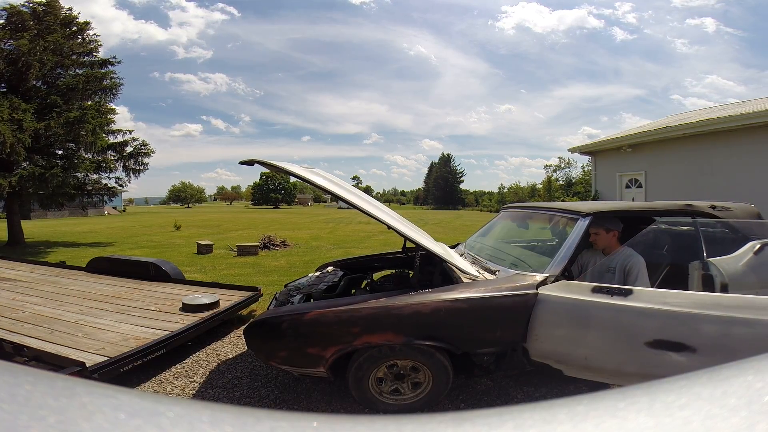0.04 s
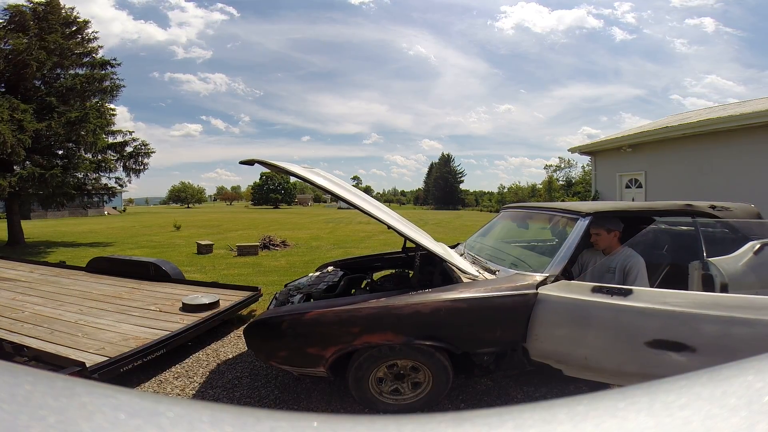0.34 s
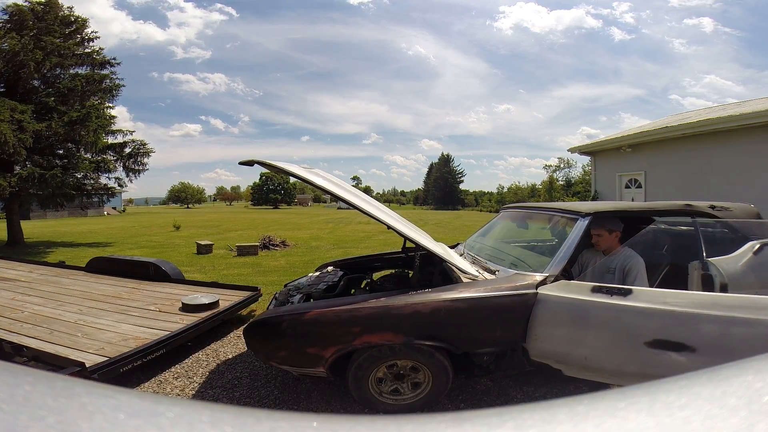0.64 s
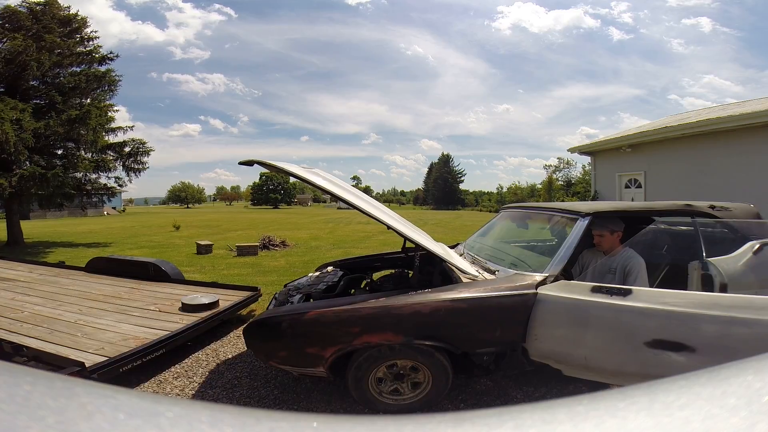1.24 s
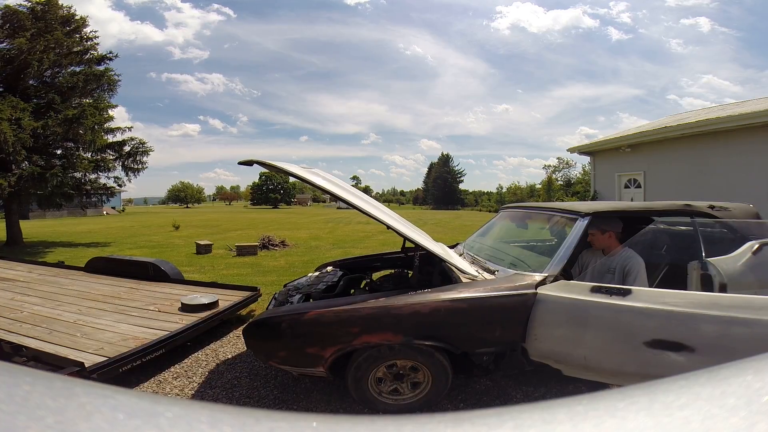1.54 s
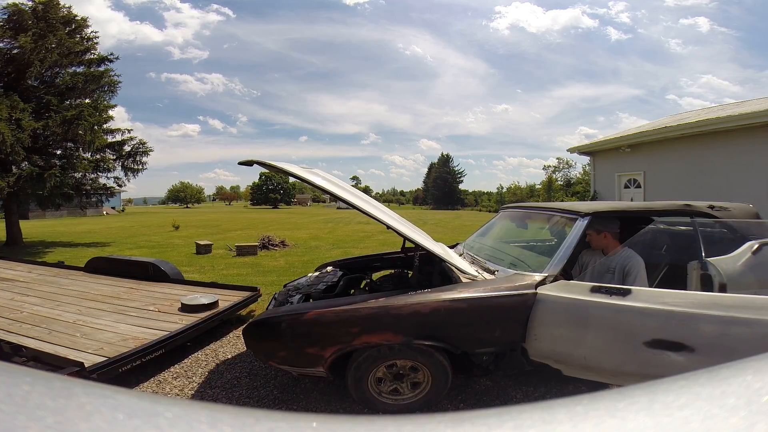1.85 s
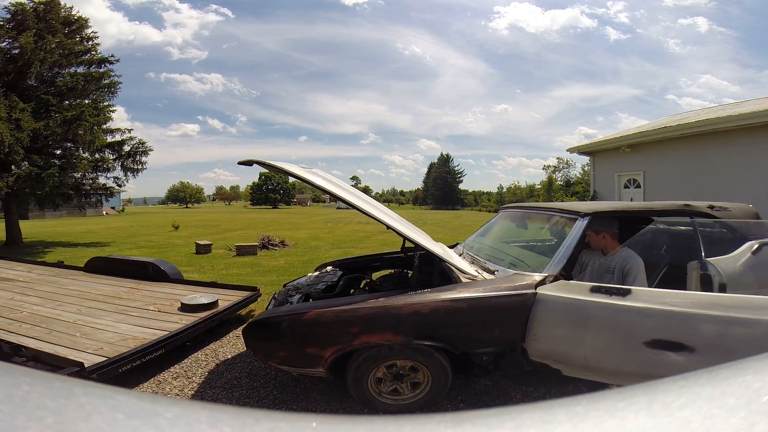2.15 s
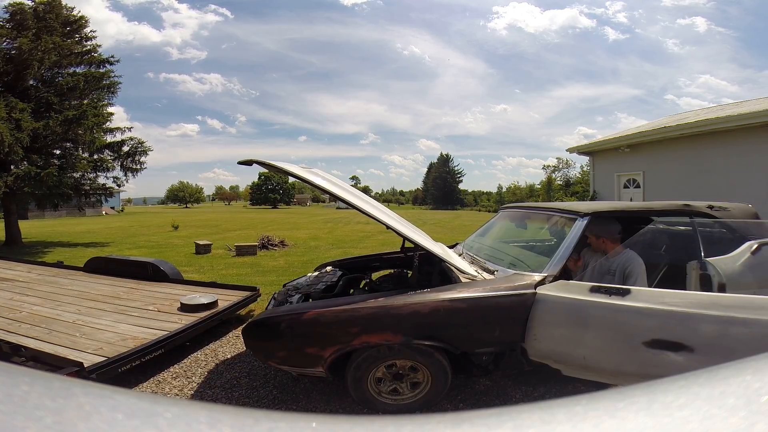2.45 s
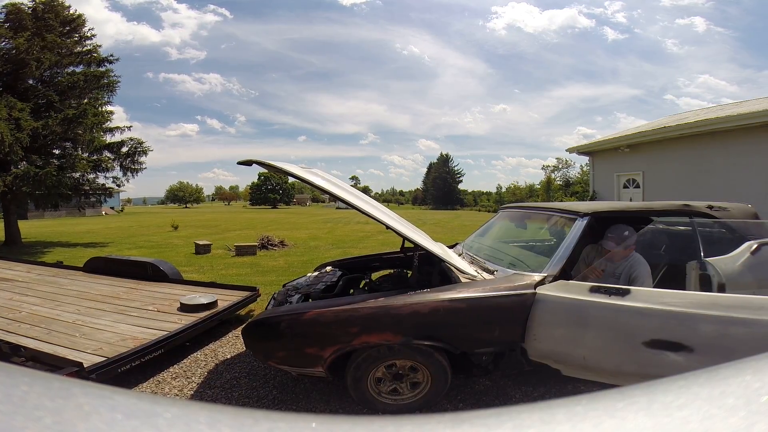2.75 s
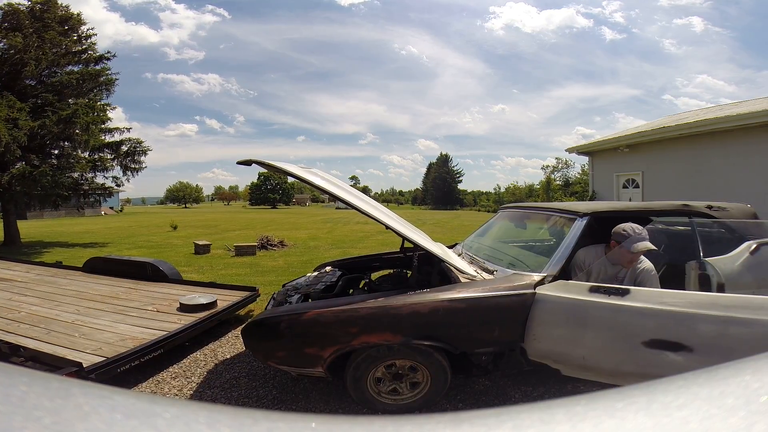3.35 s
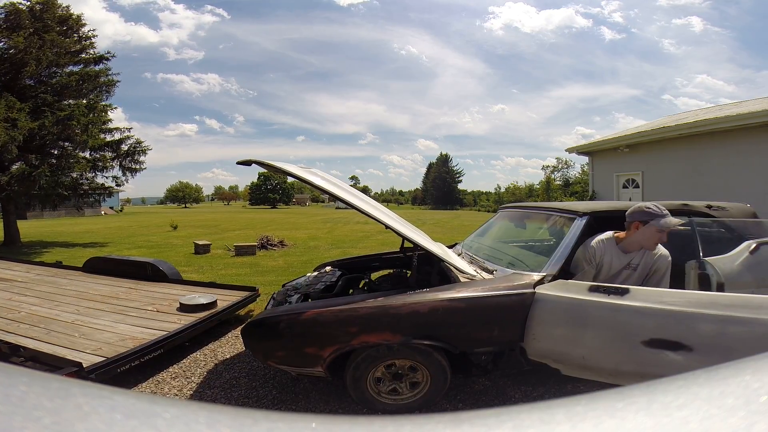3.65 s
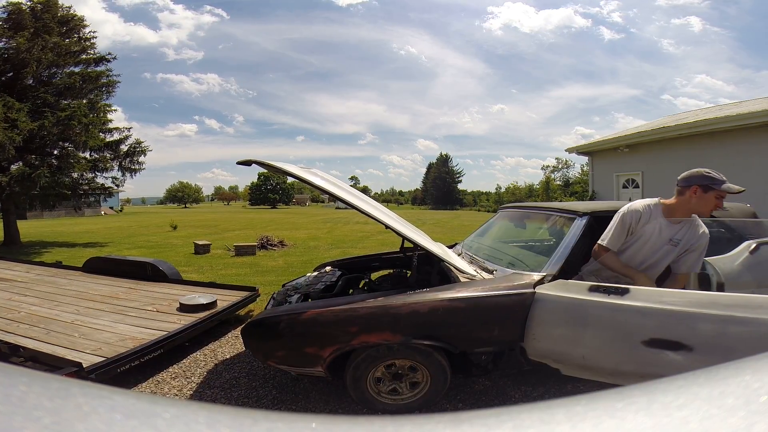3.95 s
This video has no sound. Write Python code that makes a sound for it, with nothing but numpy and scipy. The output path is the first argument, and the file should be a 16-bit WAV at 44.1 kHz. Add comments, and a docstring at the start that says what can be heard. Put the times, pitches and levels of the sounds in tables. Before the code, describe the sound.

A big car engine idles close by outdoors, hood open, with a deep, loping rumble. The exhaust burbles and pops, stumbles twice with a low cough, then slowly picks up, under pulsing hiss and bursts of clatter.

```python
"""A deep, loping exhaust boom: a big eight-cylinder engine idles on a gravel drive by a shed, hood open.
Uneven firings ring the pipe and burble and pop in the muffler; the engine nearly stumbles twice,
coughing low, and slowly picks up. On top, gas hisses in time with the cylinders and spits against
ringing sheet metal, and bursts of clatter come and go. Behind it all lies the soft rush of the fan."""
import sys
import numpy as np
from scipy import signal
from scipy.io import wavfile
from scipy.ndimage import uniform_filter1d

SR = 44100
rng = np.random.default_rng(int(sys.argv[2]) if len(sys.argv) > 2 else 0)


def materialize(psi):
    """Save the field psi as 16-bit PCM at rate SR to the path in sys.argv[1].

    A 1-D psi becomes a single channel; in a 2-D psi each row is a channel.
    """
    bounded = np.clip(np.atleast_2d(psi).T, -1, 1)
    quanta = np.round(bounded * 32767).astype(np.int16)
    wavfile.write(sys.argv[1], SR, quanta)


N = 176400
T = np.arange(N) / SR


def amp(db):
    """Decibels to gain."""
    return 10 ** (np.asarray(db) / 20)


def unit_rms(x):
    """Scales to rms 1."""
    return x / np.sqrt(np.mean(x ** 2) + 1e-20)


def curve(table):
    """Straight ramps between breakpoints in time."""
    return np.interp(T, *np.transpose(table))


def colour(x, spectrum, size=8192):
    """Minimum-phase EQ of unit energy: its peaks ring after each hit."""
    hz, db = np.transpose(spectrum)
    bin_hz = abs(np.fft.fftfreq(size, 1 / SR))
    log_gain = np.log(amp(np.interp(np.log(bin_hz + 1), np.log(hz + 1), db)))
    response = np.exp(np.conj(signal.hilbert(log_gain)))
    ring = np.fft.ifft(response).real[:size // 2] * np.hanning(size)[size // 2:]
    return signal.oaconvolve(x, ring / np.linalg.norm(ring))[:N]


def clicks(times, sizes):
    """One impulse at each time."""
    at = np.round(np.asarray(times) * SR).astype(int)
    inside = (at >= 0) & (at < N)
    return np.bincount(at[inside], sizes[inside], N)


def puffs(times, sizes, rise_s, decay_s):
    """Envelope of puffs that rise fast, die away and add in power."""
    t = T[:N // 16]
    shape = (1 - np.exp(-t / rise_s)) * np.exp(-t / decay_s)
    power = signal.oaconvolve(clicks(times, sizes ** 2), (shape / shape.max()) ** 2)[:N]
    return np.sqrt(abs(power))


def turbulence(grain_db):
    """Grainy noise that comes in small lumps."""
    lumps = unit_rms(uniform_filter1d(rng.standard_normal(N), 70))
    return unit_rms(rng.standard_normal(N) * amp(grain_db * lumps))


def scatter(db, spread_db):
    """A gain for each firing, at random around its level."""
    return amp(db) * amp(spread_db * np.clip(rng.standard_normal(len(db)), -2, 2))


# Dark, airy tone of the fan bed: f/Hz, level/dB
FAN_EQ = [(10, -15), (30, -8), (55, -5), (100, 1.5), (160, -3), (330, -10.5), (450, -21.5), (800, -30.5),
          (1600, -24.5), (3200, -33), (6500, -39.5), (11000, -53.5), (15000, -67)]

def fan_wash():
    """Steady rush of the fan and the open air."""
    return amp(-33) * unit_rms(colour(rng.standard_normal(N), FAN_EQ))


# Sheet-metal resonances under the open hood: f/Hz, sharpness/Q, level/dB
METAL_MODES = [(1840, 38, 4), (3220, 92, 2.5), (3590, 70, -17), (4540, 25, 3), (5030, 80, -2)]

def engine_bay(x, t60_s=0.08):
    """Sheet metal rings along, and the hood, ground and wall add a short tail."""
    ring = sum(amp(db) * signal.lfilter(*signal.iirpeak(hz, q, fs=SR), x) for hz, q, db in METAL_MODES)
    t = T[:N // 32]
    echoes = rng.standard_normal(len(t)) * amp(-60 * t / t60_s)
    tail = signal.oaconvolve(x, echoes / np.linalg.norm(echoes))[:N]
    return x + ring + amp(-2.5) * tail


# Cues for the spits of gas: t/s, level/dB
SPIT_CUES = [(0.1064, -34), (0.1216, -31.5), (0.2244, -28), (0.2701, -29.5), (0.303, -30.5), (0.385, -31),
             (0.4848, -24.5), (0.5133, -26), (0.557, -33), (0.628, -31), (0.7186, -30.5), (0.747, -32.5),
             (0.9718, -32), (1.0577, -33), (1.0869, -38), (1.1907, -33), (1.2032, -28.5), (1.293, -29),
             (1.324, -33), (1.411, -32), (1.4345, -33), (1.52, -34), (1.5444, -47), (1.8567, -32.5),
             (1.8863, -31), (1.9915, -33), (2.1044, -30.5), (2.289, -32.5), (2.428, -33), (2.7474, -36.5),
             (2.963, -36), (3.481, -34), (3.5862, -44), (3.8915, -36.5)]
# Their bright bite: f/Hz, level/dB
SPIT_EQ = [(400, -26), (1500, -1), (2900, 6.5), (3270, 6), (3800, 0), (4400, -1.5), (4620, 2.5),
           (4800, -3.5), (6000, -2), (8000, -7.5), (11000, -11), (13500, -18), (15000, -23)]

def spits():
    """Short, hard spits of gas with a slightly metallic edge."""
    onsets, db = np.transpose(SPIT_CUES)
    envelope = puffs(onsets, amp(db - 9.5), rise_s=0.00036, decay_s=0.011)
    return colour(envelope * turbulence(grain_db=-1.0), SPIT_EQ)


GAS_LEAD_S = 0.0035  # the gas rush leads each boom
# Fader ride of the hiss: t/s, level/dB
HISS_RIDE = [(0, -48.5), (.3, -44.5), (1.3, -44.5), (1.6, -42), (1.8, -49.5), (1.9, -48), (2.4, -44.5),
             (3.5, -44.5), (4, -47.5)]
# Its breathy tone: f/Hz, level/dB
HISS_EQ = [(300, -7.5), (1000, 11.5), (1800, 2), (3200, 3.5), (3800, -3.5), (4600, -6), (5500, -5),
           (8000, -8.5), (11000, -13.5), (13500, -20), (15000, -35)]

def hiss(times, cylinder_db, jitter_s=0.0055, crackles_per_s=640):
    """Crackling gas hisses out with each firing, harder from some cylinders."""
    onsets = times - GAS_LEAD_S + jitter_s * rng.standard_normal(len(times))
    gate = unit_rms(puffs(onsets, scatter(cylinder_db, 2.8), rise_s=0.0055, decay_s=0.0063))
    crackle = rng.standard_normal(N) * (rng.random(N) < crackles_per_s / SR)
    gas = turbulence(grain_db=-4.0) + amp(-10) * unit_rms(crackle)
    return colour(amp(curve(HISS_RIDE) - 3.5) * gate * gas, HISS_EQ)


# Boxy tone of the running chuff: f/Hz, level/dB
CHUFF_EQ = [(200, -22), (440, -4.5), (510, 7), (580, 0), (670, 6), (830, 0), (1030, -6), (1120, -5),
            (1250, -2), (1500, -18), (2500, -19.5), (5000, -36), (15000, -35.5)]
# Cues for the bursts of clatter: t/s, knock level/dB, tail level/dB
CLATTER_CUES = [(0.301, -41, -33), (0.482, -32, -30.5), (0.554, -27.5, -31.5), (0.577, -25.5, -52),
                (0.792, -30, -31), (1.03, -26, -39), (1.248, -38, -33), (1.472, -24.5, -31),
                (1.596, -33, -47), (1.856, -32, -36.5), (1.941, -26, -38), (2.046, -25.5, -36),
                (2.482, -25, -35), (2.701, -30, -43), (2.843, -43, -37), (3.013, -35, -47),
                (3.234, -27.5, -36.5), (3.411, -26, -31.5), (3.817, -26, -32.5)]
# Their midrange rasp: f/Hz, level/dB
RASP_EQ = [(200, -29), (450, -2), (670, 5), (800, 0), (1000, -7), (1120, -3), (1260, -2.5), (1550, -12.5),
           (2200, -19), (5000, -25.5), (15000, -50)]

def clatter(times, cylinder_db):
    """A coarse chuff with each firing, and now and then a knock with a rasping tail."""
    gate = unit_rms(puffs(times - GAS_LEAD_S, scatter(cylinder_db, 3.2), rise_s=0.00033, decay_s=0.03))
    chuffs = colour(amp(-39.5) * gate * turbulence(grain_db=1.5), CHUFF_EQ)
    onsets, knock_db, tail_db = np.transpose(CLATTER_CUES)
    knocks = puffs(onsets, amp(knock_db), rise_s=0.00042, decay_s=0.0028)
    tails = puffs(onsets, amp(tail_db), rise_s=0.012, decay_s=0.025)
    return chuffs + colour(np.hypot(knocks, tails) * turbulence(grain_db=0.5), RASP_EQ)


# Cues for the coughs: t/s, level/dB
COUGH_CUES = [(.305, -17), (.4, -21), (1.8, -20)]
# Their one hollow bass note: f/Hz, level/dB
COUGH_EQ = [(40, -13), (95, -33), (122, 3.5), (140, -8), (175, -17.5), (400, -44), (1000, -78),
            (4000, -110)]

def coughs():
    """Low gusts from the pipe as the engine stumbles."""
    onsets, db = np.transpose(COUGH_CUES)
    gusts = puffs(onsets, amp(db), rise_s=0.012, decay_s=0.07)
    return colour(gusts * rng.standard_normal(N), COUGH_EQ)


# Fader ride of the burble: t/s, level/dB
BURBLE_RIDE = [(0, -28), (.5, -27), (1, -28), (1.55, -22.5), (1.7, -28.5), (1.8, -32.5), (1.9, -25),
               (2.7, -25.5), (3.25, -25.5), (3.5, -22), (4, -27.5)]
# Cues for the hard pops: t/s, level/dB
POP_CUES = [(0.481, -16), (0.595, -12), (0.716, -10.5), (0.826, -9.5), (1.053, -7), (1.29, -11),
            (1.528, -11), (1.615, -9), (1.962, -5.5), (2.063, -7), (2.283, -11), (2.503, -5), (2.718, -14),
            (2.937, -15), (3.041, -5), (3.249, -13.5), (3.456, -11), (3.555, -15), (3.659, -11),
            (3.761, -10.5), (3.861, -6.5)]
# Throaty body of the muffler: f/Hz, level/dB
MUFFLER_EQ = [(60, -34), (150, -5), (185, 0.5), (218, 5), (240, -7.5), (265, 0.5), (300, 0), (335, -5),
              (370, -2.5), (410, -18), (470, -22), (700, -23.5), (2000, -90.5), (6000, -80), (16000, -110)]

def muffler_burble(times, cylinder_db, lead_s=0.00214, jitter_s=0.00049, pop_lag_s=0.00432):
    """Sharp pulses and gurgling gas ring the muffler; some firings pop hard."""
    sizes = scatter(cylinder_db, 3)
    onsets = times - lead_s + jitter_s * rng.standard_normal(len(times))
    gurgle = puffs(onsets, sizes, rise_s=0.0024, decay_s=0.012) * rng.standard_normal(N)
    drive = unit_rms(unit_rms(clicks(onsets, sizes)) + amp(2) * unit_rms(gurgle))
    pop_times, pop_db = np.transpose(POP_CUES)
    pops = clicks(pop_times + pop_lag_s, amp(pop_db + 15.5))
    return colour(amp(curve(BURBLE_RIDE) - 1) * drive + pops, MUFFLER_EQ)


# Wavering tempo of the idle: t/s, firing rate/Hz
FIRING_RATE = [(0.04, 67.3), (0.16, 63.07), (0.29, 68.17), (0.41, 54.74), (0.54, 71.51), (0.65, 69.96),
               (0.77, 67.75), (0.88, 74.87), (1.0, 66.51), (1.11, 71.96), (1.23, 63.75), (1.35, 69.82),
               (1.46, 70.87), (1.57, 82.07), (1.68, 60.71), (1.8, 71.39), (1.91, 73.0), (2.02, 76.44),
               (2.12, 78.94), (2.23, 69.4), (2.34, 74.46), (2.45, 70.89), (2.56, 80.17), (2.66, 68.83),
               (2.78, 72.27), (2.89, 73.25), (2.99, 79.4), (3.1, 74.73), (3.2, 75.74), (3.31, 79.32),
               (3.41, 76.42), (3.51, 82.74), (3.61, 75.06), (3.71, 79.72), (3.81, 78.83), (3.91, 80.63),
               (4.0, 81.12)]

def crank():
    """Running count of firing intervals as the crankshaft turns."""
    return np.cumsum(curve(FIRING_RATE)) / SR + 1.3


# The groove of the lope, one row per cylinder in firing order:
# lag/firing intervals, boom/dB, burble/dB, clatter/dB, hiss/dB
CYLINDER_GROOVE = [(0.336, 0.8, 1.5, -1.5, 4.5), (0.543, -0.6, -1, -4.5, 4), (0.533, -4.7, -3.5, -2, 12),
                   (0.503, 3, -4.5, -1, 7.5), (0.492, 5.5, -5, -8.5, -11), (0.287, 2.5, -2, 1, 4),
                   (.37, -16.5, -1.5, 1.5, 6), (0.541, 5, -4, -3, 0)]

def firings(count=320, jitter_intervals=0.037):
    """Cylinders fire in turn, each with its own lag: the times, and four layer accents per firing."""
    order = np.arange(count)
    lag, *accents_db = np.array(CYLINDER_GROOVE)[order % len(CYLINDER_GROOVE)].T
    position = order + lag + jitter_intervals * rng.standard_normal(count)
    times = np.interp(position, crank(), T, left=-1, right=T[-1] + 1)
    return times, *accents_db


# Fader ride of the boom: t/s, level/dB
BOOM_RIDE = [(0.0, -13), (0.02, -17), (0.1, -16.5), (0.15, -10.5), (0.18, -18), (0.3, -15.5), (0.33, -8),
             (0.43, -19.5), (0.49, -15), (0.51, -8.5), (0.58, -12), (1.16, -13), (1.48, -10.5),
             (1.79, -16.5), (1.82, -24), (1.9, -11), (1.98, -14.5), (2.0, -12.5), (3.65, -13.5),
             (4.0, -15.5)]
# Bass weight of the exhaust pipe: f/Hz, level/dB
PIPE_EQ = [(8, -68.5), (25, -48.5), (42, -37.5), (58, -30.5), (74, -34.5), (95, -31.5), (125, -31.5),
           (155, -51.5), (210, -50.5), (300, -66.5), (450, -77), (900, -100), (4000, -135)]

def exhaust_boom(times, cylinder_db):
    """The gas flow throbs at the firing rate, and each firing rings the exhaust pipe."""
    pulses = clicks(times, -scatter(cylinder_db, 3))
    pipe = amp(-2.5) * unit_rms(colour(pulses, PIPE_EQ))
    throb = unit_rms(np.cos(2 * np.pi * (crank() - 0.35)))
    return amp(curve(BOOM_RIDE)) * (pipe + throb)


def scene():
    """One train of firings drives boom, burble, chuff and hiss; cued hits and the fan fill out the mix."""
    times, boom_db, burble_db, clatter_db, hiss_db = firings()
    exhaust = exhaust_boom(times, boom_db) + muffler_burble(times, burble_db) + coughs()
    rattle = clatter(times, clatter_db)
    gas = engine_bay(hiss(times, hiss_db) + spits())
    return (fan_wash() + gas + rattle + exhaust)[None]


def record(dry, cutoff_hz=15100):
    """A steep high cut takes off the very top."""
    high_cut = signal.firwin(511, cutoff_hz, window=("kaiser", 9), fs=SR)
    return signal.oaconvolve(dry, high_cut[None], "same")


dry = scene()
out = record(dry)
materialize(out)
```